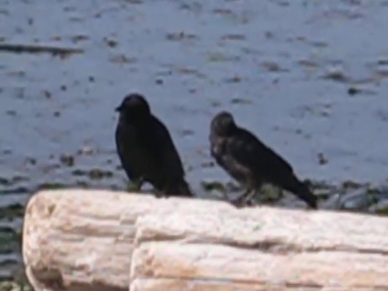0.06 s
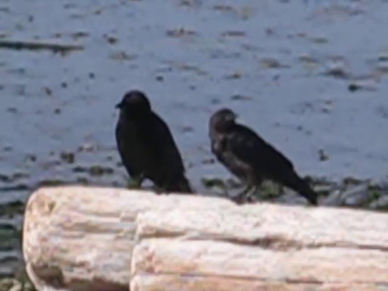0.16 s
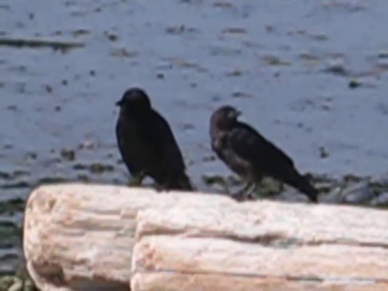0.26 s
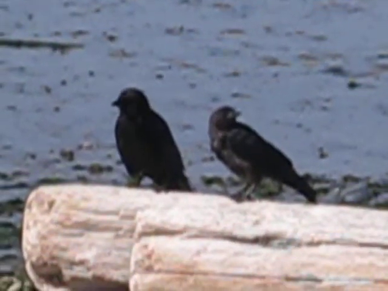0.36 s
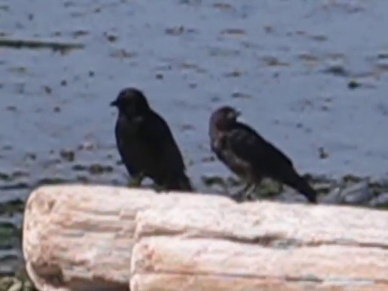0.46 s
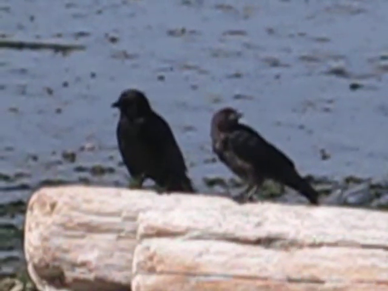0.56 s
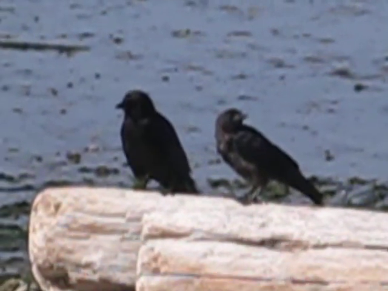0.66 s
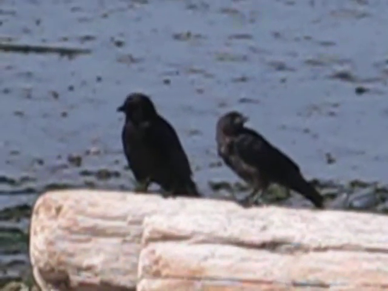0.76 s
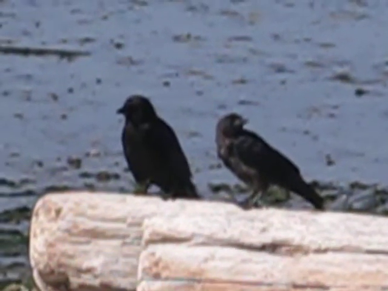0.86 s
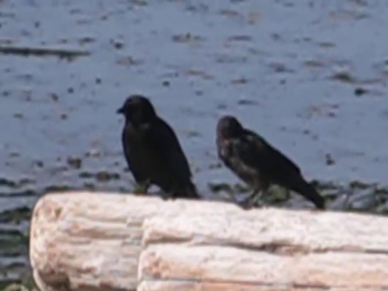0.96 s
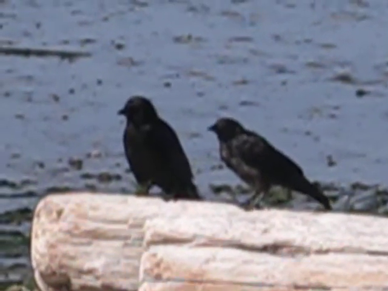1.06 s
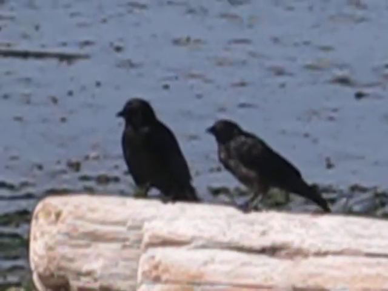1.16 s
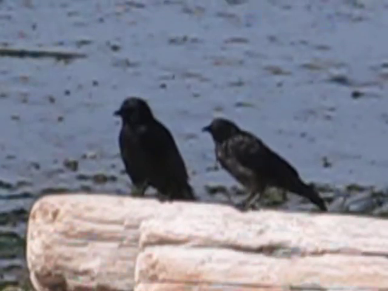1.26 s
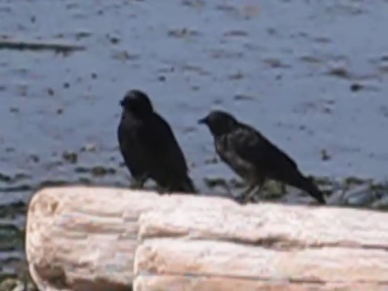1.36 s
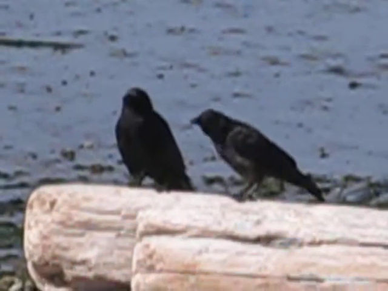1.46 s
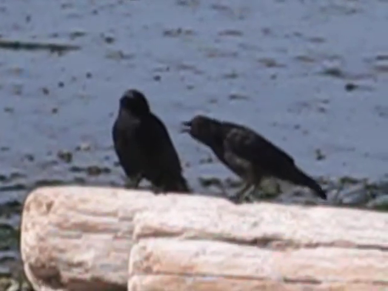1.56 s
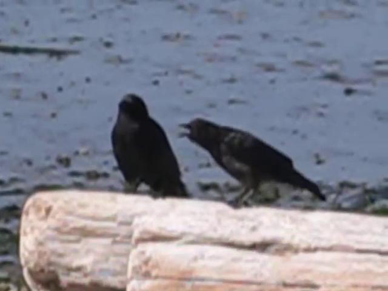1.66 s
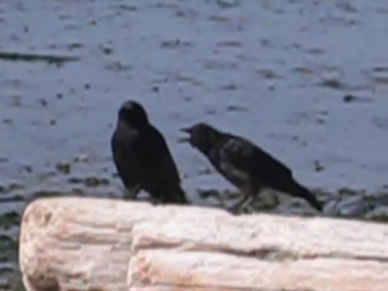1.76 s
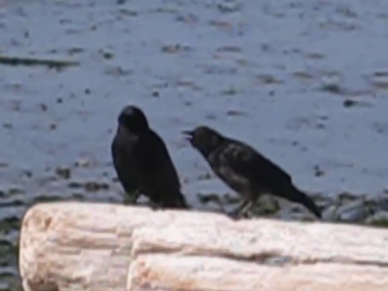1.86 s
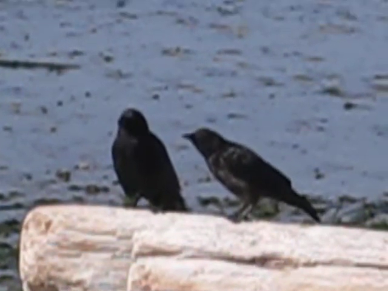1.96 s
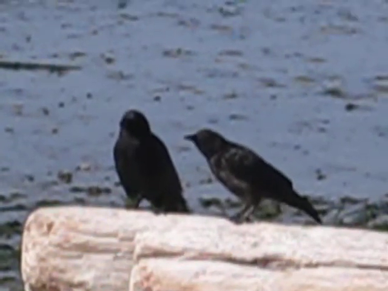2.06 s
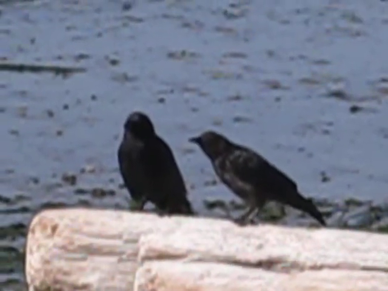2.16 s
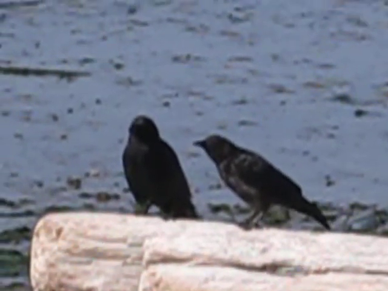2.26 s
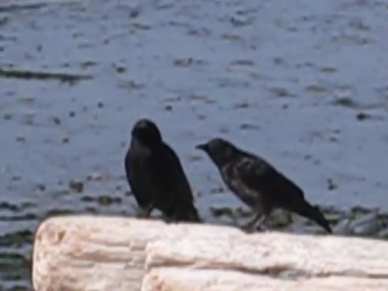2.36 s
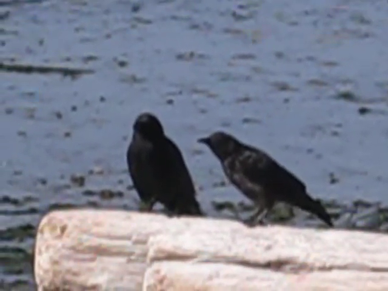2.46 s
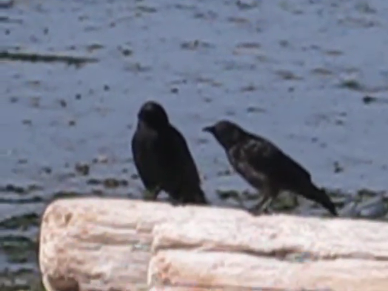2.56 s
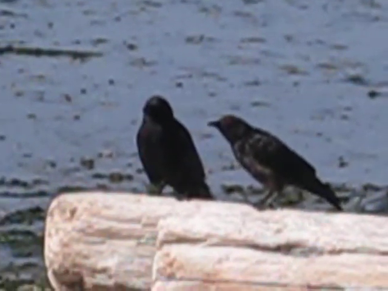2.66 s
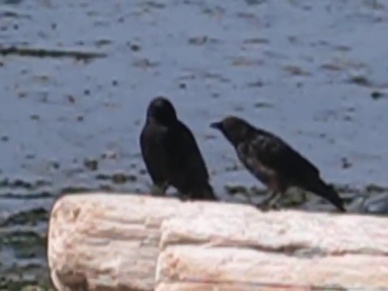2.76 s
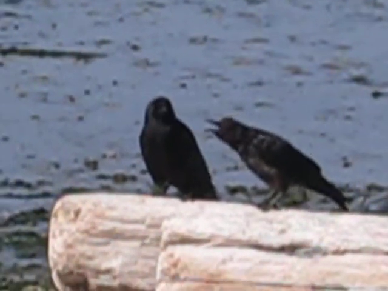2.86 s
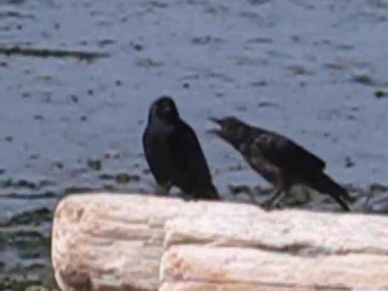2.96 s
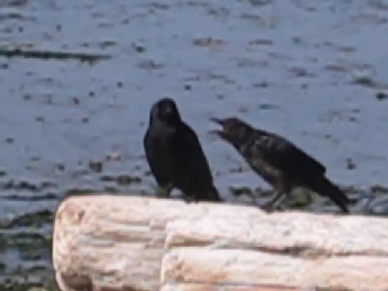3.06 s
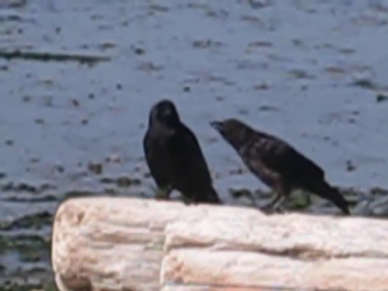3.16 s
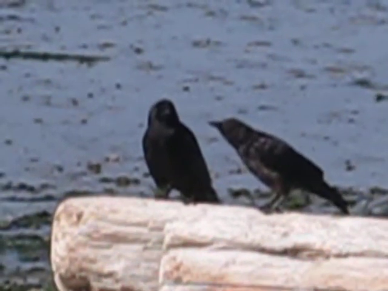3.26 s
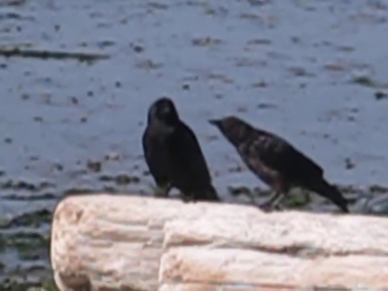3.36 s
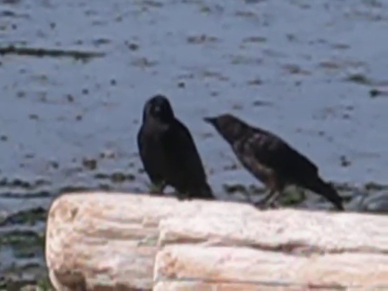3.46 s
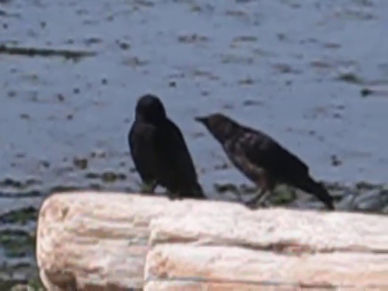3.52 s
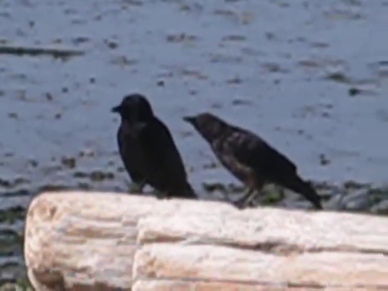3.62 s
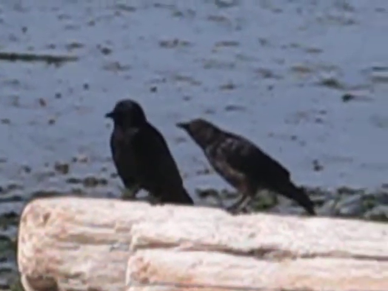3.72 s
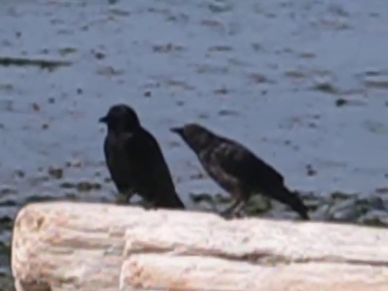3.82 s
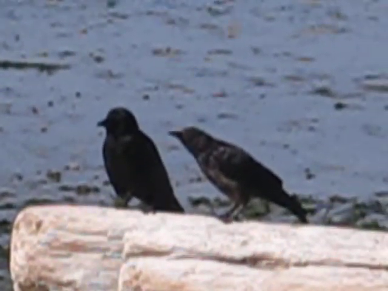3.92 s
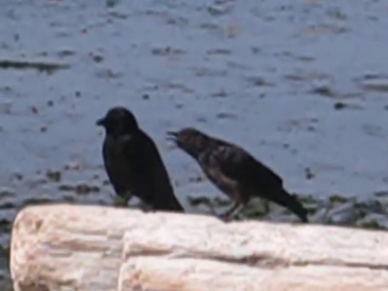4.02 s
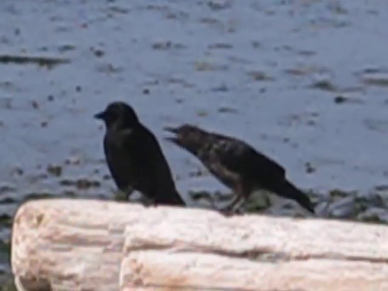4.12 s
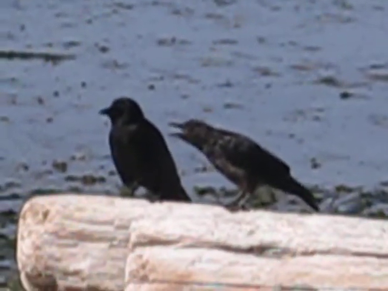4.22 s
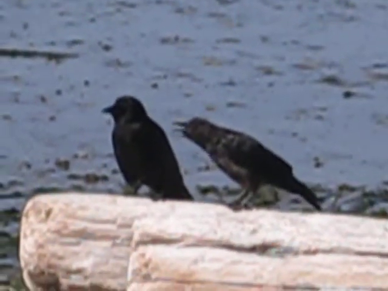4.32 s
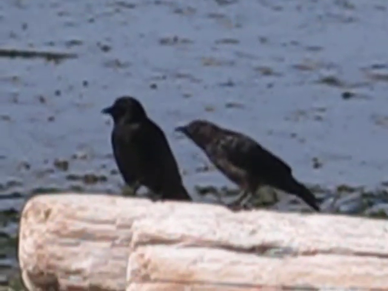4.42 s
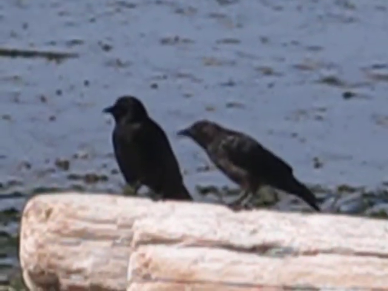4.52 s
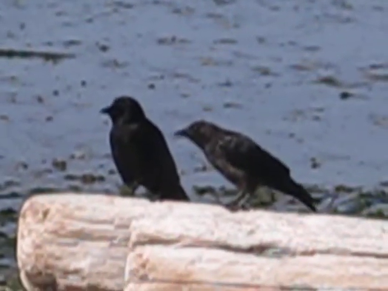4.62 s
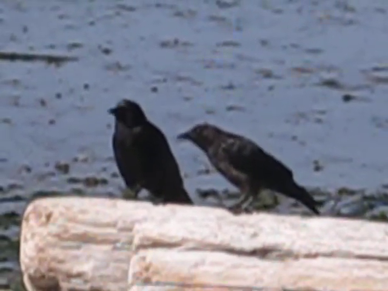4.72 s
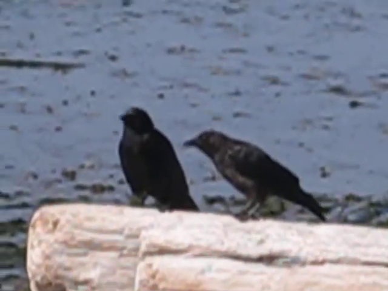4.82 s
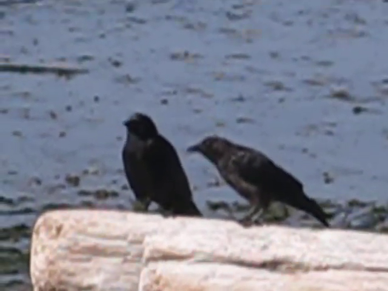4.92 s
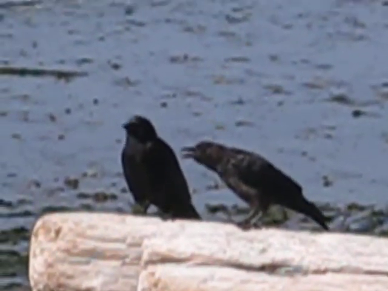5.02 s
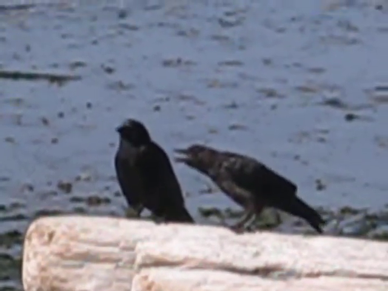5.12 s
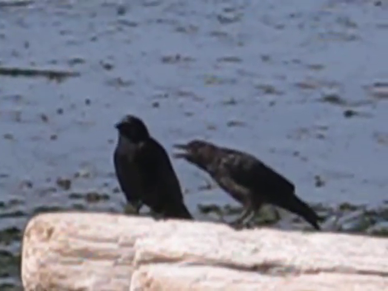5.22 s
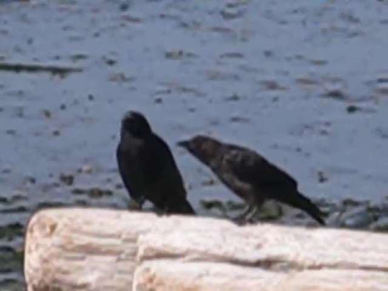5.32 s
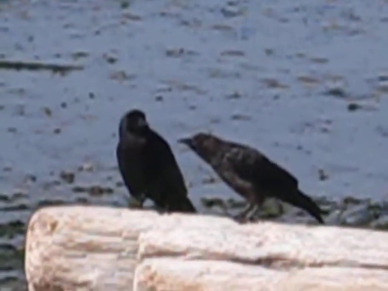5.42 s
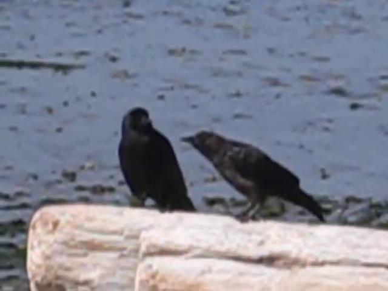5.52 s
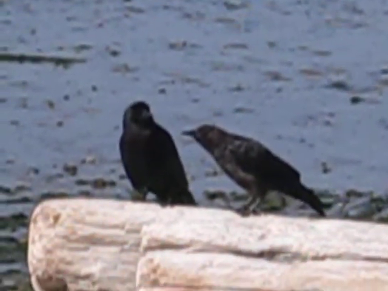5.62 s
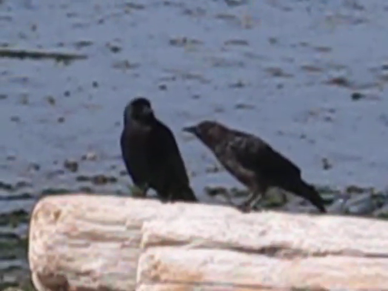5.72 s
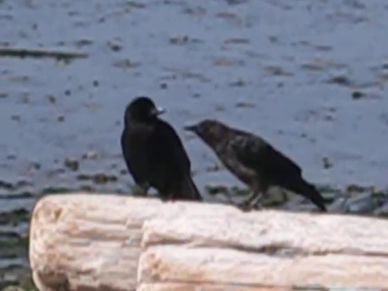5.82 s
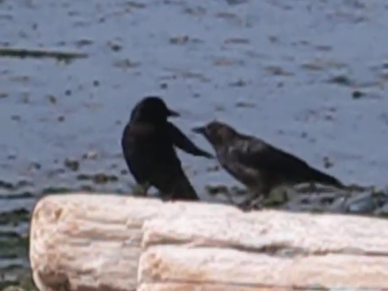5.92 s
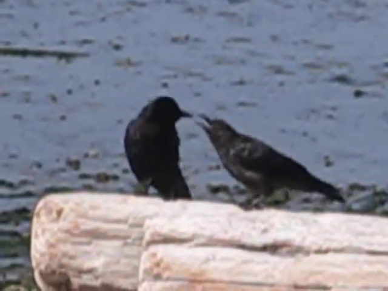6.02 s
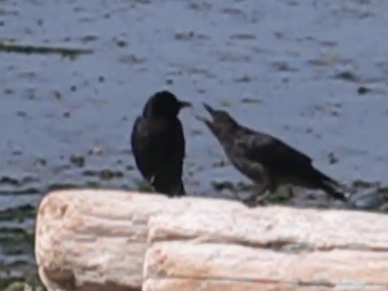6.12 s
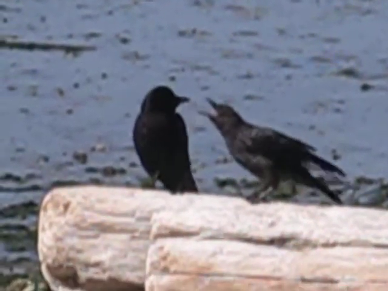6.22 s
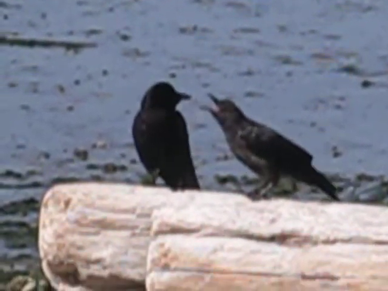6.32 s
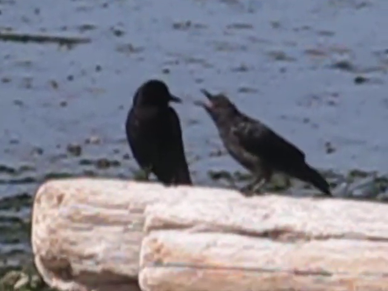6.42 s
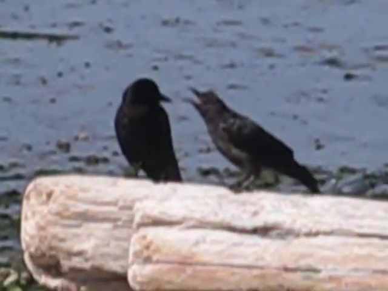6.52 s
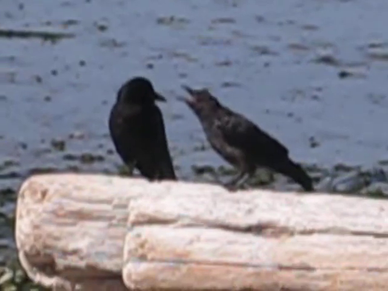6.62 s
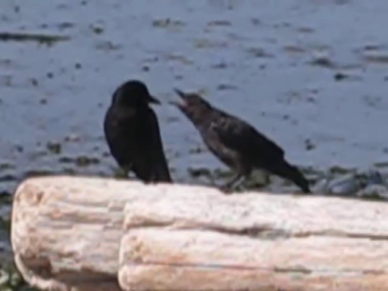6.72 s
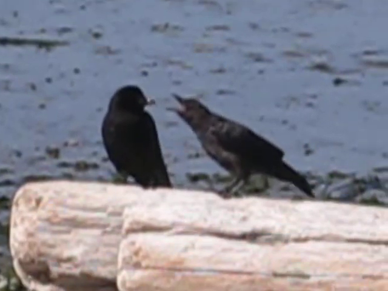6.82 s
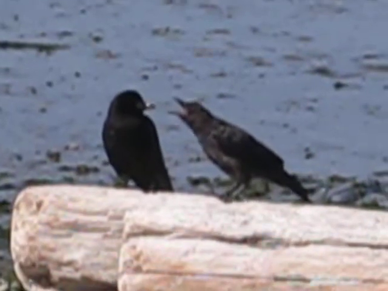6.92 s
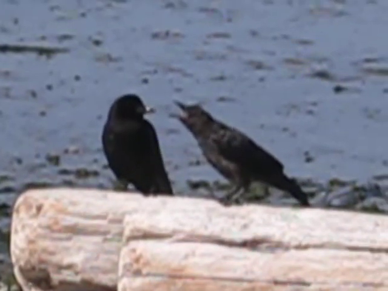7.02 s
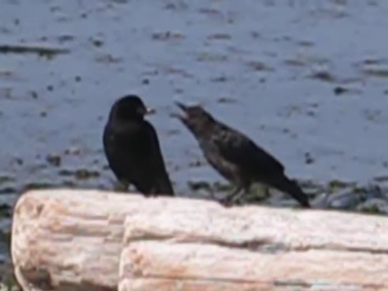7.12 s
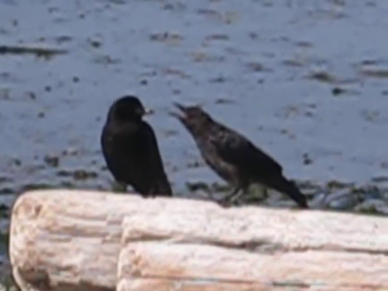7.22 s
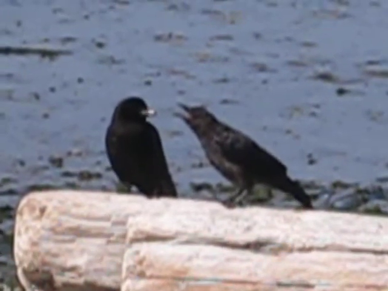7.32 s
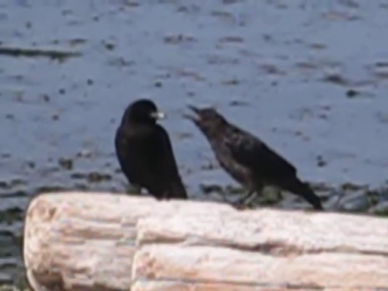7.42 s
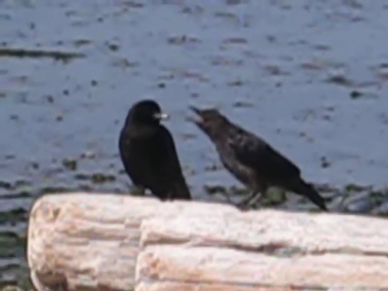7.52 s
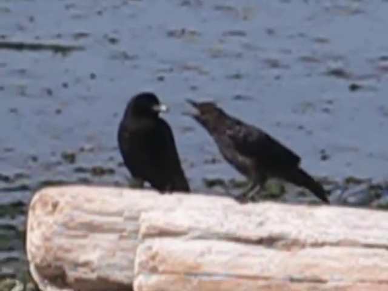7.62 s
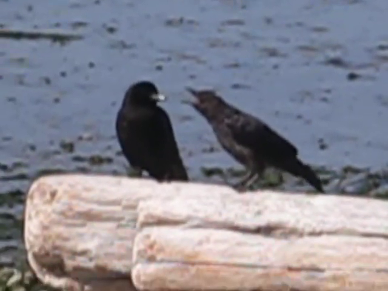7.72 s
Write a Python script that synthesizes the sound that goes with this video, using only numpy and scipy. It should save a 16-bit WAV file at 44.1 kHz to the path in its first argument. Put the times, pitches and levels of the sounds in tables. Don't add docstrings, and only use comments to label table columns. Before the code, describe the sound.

The scene opens on the dull, muffled tail of a young crow's caw, gone almost at once, leaving quiet shore wash, low wind rumble and a barely audible engine hum. A tiny claw tick comes at 0.3 s and a faint, blurred far crow at 1.0 s. At 1.6 s the near crow gives a clear, nasal, whining begging caw of about 0.3 s. Another distant call follows at 2.3 s. Near caws return at 2.9 and 4.1 s, each overlapped by a weaker crow just behind. A dull knock lands at 4.6 s, then a sagging caw at 5.0 s. Calls become more urgent at 6.1 and 6.7 s, with the second crow at 6.6 s, a sharper tick at 6.5 s and a soft knock at 6.8 s. A brief faint drone passes around 7.1 to 7.5 s before the last caw at 7.6 s. Centred sound, open air, very faint late echo.

```python
import sys
import numpy as np
from scipy import signal
from scipy.fft import rfft, irfft
from scipy.io import wavfile
from scipy.ndimage import uniform_filter1d

SR = 44100
rng = np.random.default_rng(int(sys.argv[2]) if len(sys.argv) > 2 else 0)


def to_wav(s):
    ch = np.atleast_2d(s).T
    pcm = np.round(np.clip(ch, -1, 1) * 32767)
    wavfile.write(sys.argv[1], SR, pcm.astype(np.int16))


N = 343098
LEAD = SR // 2
EDGE_HZ = 15950


def gain_of(db):
    return 10 ** (np.asarray(db) / 20)


def evened(x):
    return x / np.sqrt(np.mean(x ** 2) + 1e-20)


def read(points, hz):
    f, value = np.transpose(points)
    return np.interp(np.log(hz + 1), np.log(f + 1), value)


def add(mix, s, sound):
    part = mix[LEAD + round(s * SR):][:len(sound)]
    part += sound[:len(part)]


def drift(shape, samples):
    return evened(uniform_filter1d(uniform_filter1d(rng.standard_normal(shape), samples), samples))


def resonance(hz, centre_hz, width_hz):
    return (1j * width_hz * hz / (centre_hz ** 2 - hz ** 2 + 1j * width_hz * hz)) ** 2


GLIDE_HZ, ONSET_S, RELEASE_S = 119.8, .012, .036
ONSET_DB_PER_S, RELEASE_DB_PER_S, TREBLE_RELEASE_DB_PER_S = 600, 332, 450
SLACK_START_HZ = 250.6
FLUTTER_HZ, FLUTTER, FLUTTER_GROWTH_PER_S = 48, .0025, 2.5
CLOSE_AT_S, CLOSE_DB_PER_S = 0.044, 13


def effort(row, arch, law):
    start, length, held_hz, sag, bright_db = row
    rise_s, fall_s, push, push_s, push_width_s, slack_hz = arch
    t = np.arange(-ONSET_S, length + RELEASE_S, 1 / SR)
    after = np.maximum(t - length, 0)
    pull = held_hz - sag * t + push * np.exp(-((t - push_s) / push_width_s) ** 2)
    pull = pull - GLIDE_HZ * (np.exp(-t / rise_s) + np.exp((t - length) / fall_s))
    floor_hz = np.where(t < push_s, SLACK_START_HZ, slack_hz)
    hz = uniform_filter1d(np.maximum(pull, floor_hz), size=200)
    flutter = np.sin(2 * np.pi * FLUTTER_HZ * t + drift(len(t), 900))
    hz = hz * (1 + FLUTTER * (1 + FLUTTER_GROWTH_PER_S * t) * flutter)
    pitch, *levels = np.transpose(law)
    fade_db = RELEASE_DB_PER_S * after + ONSET_DB_PER_S * np.maximum(-t, 0)
    sixth_db, fourth_db, upper_db = (
        uniform_filter1d(np.interp(pull, pitch, db), size=400) - fade_db for db in levels)
    fourth_db = fourth_db - CLOSE_DB_PER_S * np.maximum(t - CLOSE_AT_S, 0)
    upper_db = upper_db - TREBLE_RELEASE_DB_PER_S * after + bright_db
    return start - ONSET_S, hz, sixth_db, fourth_db, upper_db


# [f/Hz, width/Hz]
THROAT = [(2134, 325), (1607, 273)]
# [order, level/dB]
PULSE = [(7, -6), (10, 2), (11, -3.5), (17, 2), (20, -6.5), (21, 1)]


def caw(row, pose, arch, law, pipe, follow, slack):
    start, hz, sixth_db, fourth_db, upper_db = effort(row, arch, law)
    notch, spacing_hz, tilt_db, favoured_hz, lift_db = pose
    order = np.arange(1, 59)[:, None]
    step = 32
    pitch = hz[::step]
    f = order * pitch
    upper, lower = (resonance(f * (370 / pitch) ** share, *mode) for mode, share in zip(THROAT, follow))
    upper_throat = gain_of(sixth_db[::step]) * abs(upper / upper[5])
    lower_throat = gain_of(fourth_db[::step]) * abs(lower / lower[3])
    throat = np.hypot(upper_throat, lower_throat)
    back = np.clip(notch, 0, .9) * np.clip(f / 3000 - .4, 0, 1) * np.exp(-2j * np.pi * f / spacing_hz)
    off_favoured = (f * (370 / pitch) ** (1 - slack) - favoured_hz) / 450
    head_db = tilt_db * np.log2(np.maximum(f / 4000, 1)) + lift_db * np.exp(-off_favoured ** 2)
    shimmer_db = 2.6 * np.clip(order / 8, 0, 1) * drift(f.shape, 70)
    pulse_db = slack * sum(db * (order == round(k)) for k, db in PULSE)
    tube = gain_of(read(pipe, f) + head_db + shimmer_db + pulse_db) * abs(1 - back) * (f < EDGE_HZ)
    band = (f > 3200) & (f < 8000)
    tube *= gain_of(upper_db[::step]) / uniform_filter1d(np.sqrt((tube ** 2 * band).sum(0)), 40)
    lag = (np.angle(upper) + np.angle(lower)) / 2
    lag += rng.standard_normal(order.shape) * 1.7 * (order > 7) * (order < 36)
    lag += 1.1 * (order == 5)
    rasp_db = -30 + 23 * np.clip((345 - pitch) / 70, 0, slack)
    rasp_db = rasp_db + np.clip(1.2 * (order - 6), 0, 9) * (1.6 - .6 * slack)
    breath = gain_of(rasp_db) * (drift(f.shape, 2) + 1j * drift(f.shape, 2))
    weight = np.hypot(throat, tube) * np.exp(1j * lag) * (1 + breath)
    jitter = .0012 * drift(len(hz), 120) + .002 * drift(len(hz), 500)
    turns = np.cumsum(hz * (1 + jitter)) / SR
    at, knots = np.arange(len(hz)), np.arange(0, len(hz), step)
    sound = np.zeros(len(hz))
    for k, w in zip(order[:, 0], weight):
        sound += (np.interp(at, knots, w) * np.exp(2j * np.pi * k * turns)).real
    return start, np.sqrt(2) * sound * signal.windows.tukey(len(hz), .12)


# [start t/s, length t/s, held pitch f/Hz, sag Hz/s, treble turned to the microphone level/dB]
NEAR = [
    (-.262, .268, 318, 39, -18),
    (1.559, 0.32, 365.5, 16, -1.3),
    (2.86, 0.28, 362.7, -42, -1.5),
    (4.069, 0.28, 351.6, -42.5, 0.2),
    (5.047, 0.26, 371.8, 80.5, 0.5),
    (6.094, .268, 376.5, -41.5, 0),
    (6.727, 0.25, 380.5, 2.5, -0.6),
    (7.563, 0.28, 351.5, -40.5, -1),
]
# [notch depth 0-1, windpipe notch spacing f/Hz, treble tilt dB/octave,
# favoured f/Hz, its lift level/dB]
NEAR_POSE = [(.5, 1480, -11, 2250, 11), (.6, 1412, 2.5, 3650, 0.5), (.6, 1423, 1.5, 3780, 0),
             (.75, 1603, -0.2, 5770, 5), (.85, 1716, -2, 5980, 6), (.5, 1490, -2, 3480, 3.5),
             (.55, 1523, -1, 3660, 5), (.65, 1550, -2.5, 6000, 6)]
# [rise t/s, fall t/s, push f/Hz, push at t/s, push width t/s, slack end pitch f/Hz]
NEAR_ARCH = (.0161, .0312, 13, .0946, .0511, 272)
# [pitch f/Hz, 6th partial, 4th partial, upper partials level/dB]
NEAR_EFFORT = [(261, -41.5, -58, -45), (295.7, -26, -42, -34), (337, -21.5, -34.5, -31),
               (352, -20.5, -31, -31), (365.8, -19.5, -25.5, -30), (378.6, -22, -22.5, -28.5),
               (404, -27, -22, -27)]
# [f/Hz, level/dB]
NEAR_PIPE = [(330, -41), (500, 9), (750, 2.5), (1150, 4.5), (2600, 17.5), (3000, 4), (3600, 10.5),
             (4500, 6), (6000, 4.5), (8000, 1.5), (10000, -6), (12000, -16), (15500, -30)]


def near_crow(mix):
    for row, pose in zip(NEAR, NEAR_POSE):
        add(mix, *caw(row, pose, NEAR_ARCH, NEAR_EFFORT, NEAR_PIPE, follow=(.55, .7), slack=1.0))


def shore(x, bank_s=0.255, bank_spread_s=0.026, bank_db=9, t60=0.57, dull_hz=3500, stir=0.48):
    taps, count = np.zeros(SR), (SR - 1) // 40
    places = np.arange(0, SR - 40, 40) + rng.integers(0, 40, count)
    taps[places] = rng.choice([-1., 1.], count)
    t = np.arange(SR) / SR
    bank = bank_db * np.exp(-((t - bank_s) / bank_spread_s) ** 2)
    taps *= gain_of(bank - 60 * t / t60) * np.clip(t / 0.088 - .5, 0, 1)
    taps = signal.lfilter(*signal.butter(2, dull_hz, fs=SR), taps)
    stirred = x * (1 + stir * drift(len(x), 70))
    return signal.fftconvolve(stirred, taps / np.linalg.norm(taps))[:len(x)]


# [f/Hz, level/dB per Hz]
BAY = [(18, -18), (25, -31), (32, -1), (40, -4.5), (70, 1), (110, -5), (180, -12.5), (400, -18.5),
       (1000, -23), (1700, -21.5), (2600, -23.5), (4200, -29.5), (6500, -37), (10000, -44), (15700, -50.5)]
BAY_DB = -41.5
# [t/s, level/dB]
WASH = [(0, 0), (.8, -1.5), (1.4, -4.5), (2.3, -0.5), (3.7, -2.5), (4.8, -1), (5.8, -3.5), (7.3, -1),
        (7.78, -3.5)]


def bay():
    frames, hz = N // 256 + 5, np.fft.rfftfreq(1024, 1 / SR)
    a, b, patches = rng.standard_normal((frames, 513, 3)).T
    patches = evened(uniform_filter1d(uniform_filter1d(patches, 12, 0), 14, 1))
    swell_db = np.interp(np.arange(frames) * 256 / SR, *np.transpose(WASH))
    share = np.clip(hz / 900, 0, 1) * np.clip(1.6 - hz / 8000, 0, 1)
    z = (a + 1j * b) * gain_of(1.3 * patches + share[:, None] * swell_db)
    flat = signal.istft(z, nperseg=1024, noverlap=768)[1][:N]
    colour = gain_of(read(BAY, np.fft.rfftfreq(N, 1 / SR)))
    return gain_of(BAY_DB) * evened(irfft(rfft(flat) * colour, N))


# [from t/s, to t/s, f/Hz, level/dB]
HUM = [
    (-1, 8.9, 381, -64),
    (7.05, 7.55, 252, -54),
    (-1, 8.9, 44, -50.5),
]


def hum():
    t, out = np.arange(N) / SR, np.zeros(N)
    for s0, s1, hz, db in HUM:
        on = np.clip(np.minimum(t - s0, s1 - t) / .08, 0, 1)
        turns = np.cumsum(hz * (1 + 0.00612 * drift(N, 4000))) / SR
        out += on * gain_of(db + 2.8 * drift(N, 3000)) * np.sqrt(2) * np.cos(2 * np.pi * turns)
    return out


# [t/s, f/Hz, level/dB, t60 t/s]
KNOCKS = [
    (0.277, 2920, -52, .015),
    (1.43, 9000, -53, .008),
    (4.615, 584, -37.5, 0.067),
    (5.65, 8000, -58, .008),
    (6.506, 4230, -35.5, 0.015),
    (6.771, 497, -33.5, 0.038),
]


def knocks(mix):
    t = np.arange(4000) / SR
    for s, hz, db, t60 in KNOCKS:
        ring = gain_of(db - 60 * t / t60) * np.sin(2 * np.pi * hz * t)
        add(mix, s, ring * np.clip(t * hz / 0.78, 0, 1))


# [start t/s, length t/s, top of the strongest partial f/Hz, sag Hz/s, level/dB]
FAR = [
    (1.001, .38, 1710, 1300, -58.5),
    (2.302, 0.29, 1697, 1760, -54.5),
]
FAR_RISE_S, FAR_RISE_HZ, FAR_RELEASE_S = .06, 111, 0.062


def far_crow(mix):
    for start, length, top_hz, sag, level_db in FAR:
        t = np.arange(0, length, 1 / SR)
        hz = top_hz - FAR_RISE_HZ * np.maximum(1 - t / FAR_RISE_S, 0) - sag * np.maximum(t - FAR_RISE_S, 0)
        db = level_db - 12 * np.maximum(1 - (length - t) / FAR_RELEASE_S, 0)
        phase = 2 * np.pi * np.cumsum(hz * (1 + .02 * drift(len(hz), 150))) / SR
        lines = np.cos(phase) + .5 * np.cos(phase * 6 / 5) + 0.47 * np.cos(phase * 4 / 5)
        add(mix, start, gain_of(db + 1.7 * drift(len(hz), 300)) * evened(lines))


BEHIND = [
    (2.966, .345, 354.5, 22, 1.5),
    (4.029, .35, 359.3, 431, -6),
    (6.572, .35, 355.5, 79.92, 2),
]
BEHIND_POSE = [(0.75, 1320, 2.4, 2580, 8.3), (0.28, 1500, -1.8, 2960, 0.67), (0.34, 1610, 1.8, 4300, 4.6)]
BEHIND_ARCH = (.0195, .06, 20, .0768, .0569, 248)
BEHIND_EFFORT = [(250.5, -53, -57, -57.5), (284, -34.5, -47.5, -44.5), (305, -36, -44, -45.5),
                 (341.5, -34.5, -37, -40), (362, -27, -32, -38.5), (377, -31, -31, -35.5)]
# [f/Hz, level/dB]
BEHIND_PIPE = [(300, -29), (600, 13), (750, 5), (1100, -19), (2700, 13), (3500, 1.5), (4600, 1), (6500, 3),
               (8000, 2.5), (10000, -11.5), (12000, -13), (15500, -29)]


def behind_crow(mix):
    for row, pose in zip(BEHIND, BEHIND_POSE):
        add(mix, *caw(row, pose, BEHIND_ARCH, BEHIND_EFFORT, BEHIND_PIPE, follow=(.95, .9), slack=0.51))


def scene():
    crows = np.zeros(N + LEAD)
    near_crow(crows)
    behind_crow(crows)
    crows += gain_of(-32.5) * shore(crows)
    knocks(crows)
    far_crow(crows)
    return np.tile(crows[LEAD:] + bay() + hum(), (2, 1))


def noise_fill(x, loud_db=-32, loud_share=.22, quiet_share=.009, band_share=.4):
    window = signal.windows.kaiser_bessel_derived(2048, 4 * np.pi)
    hz, t, z = signal.stft(x, SR, window, nperseg=2048, noverlap=1024)
    loud = 10 * np.log10((abs(z[0]) ** 2).sum(0) + 1e-12) > loud_db
    gliding = loud & ~np.roll(loud, 3)
    frame = rng.random(len(t)) < np.where(loud, loud_share, quiet_share) * (1 + 2 * gliding)
    band = (hz // 1400).astype(int)
    chosen = (rng.random((band.max() + 1, len(t))) < band_share)[band] & frame
    chosen &= band[:, None] > np.where(loud & ~gliding, 4, 2)
    level = np.sqrt(abs(uniform_filter1d(abs(z) ** 2, 30, 1)))
    noise = level * (rng.standard_normal(z.shape) + 1j * rng.standard_normal(z.shape))
    filled = np.where(chosen, noise, z)
    return signal.istft(filled, SR, window, nperseg=2048, noverlap=1024)[1][:, :N]


def top_cut(x):
    return signal.sosfilt(signal.butter(12, 15750, fs=SR, output="sos"), x)


def record(dry):
    low_pass = signal.firwin(511, EDGE_HZ, window=("kaiser", 9), fs=SR)
    x = signal.oaconvolve(dry, low_pass[None], "same")
    return top_cut(noise_fill(x))


dry = scene()
out = record(dry)
to_wav(out)
```